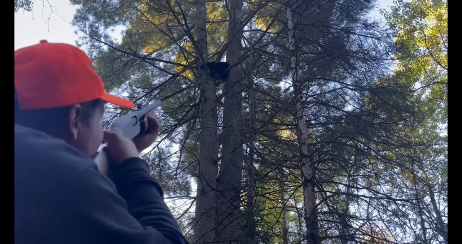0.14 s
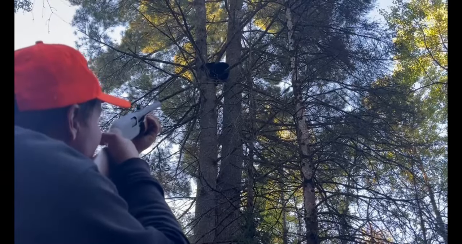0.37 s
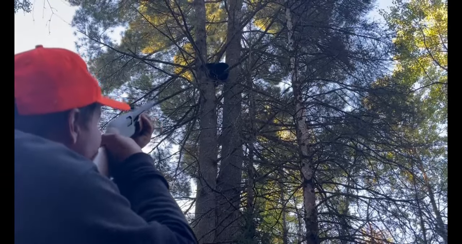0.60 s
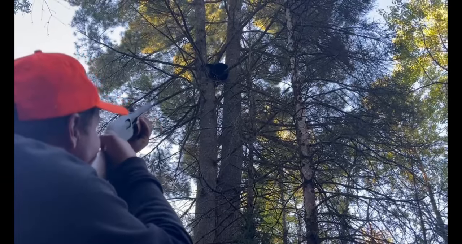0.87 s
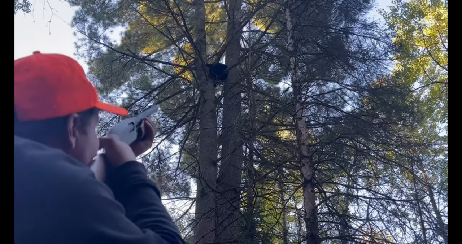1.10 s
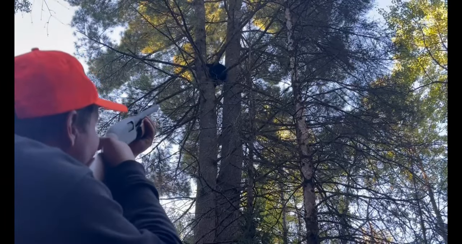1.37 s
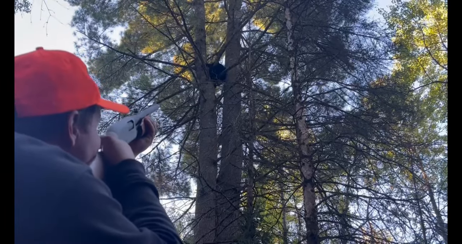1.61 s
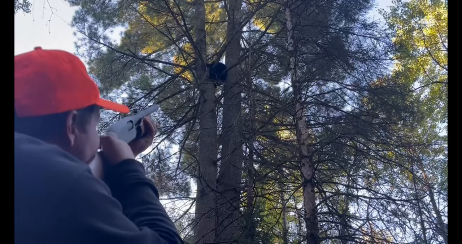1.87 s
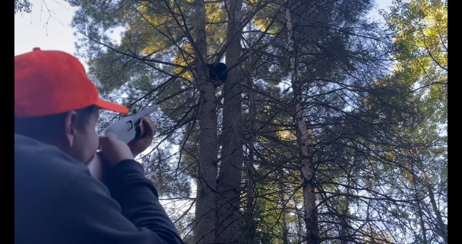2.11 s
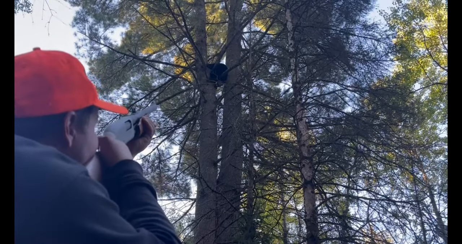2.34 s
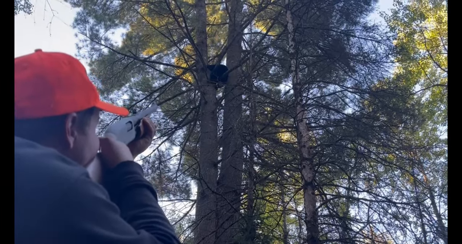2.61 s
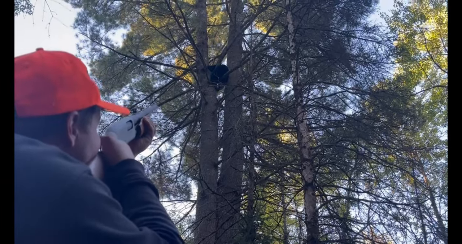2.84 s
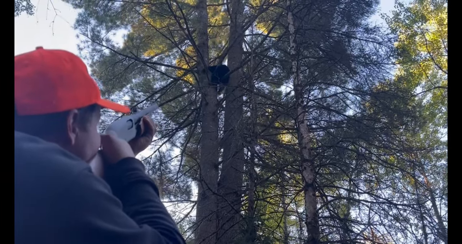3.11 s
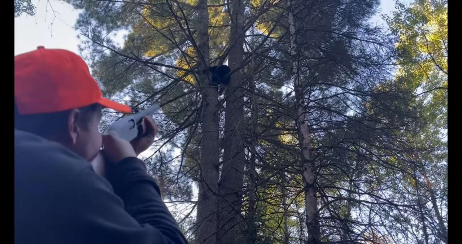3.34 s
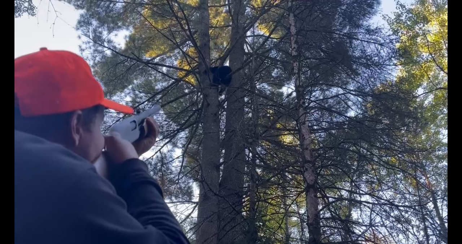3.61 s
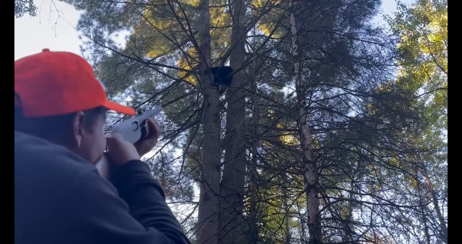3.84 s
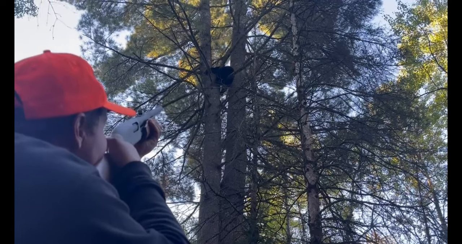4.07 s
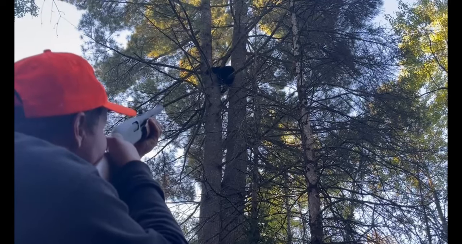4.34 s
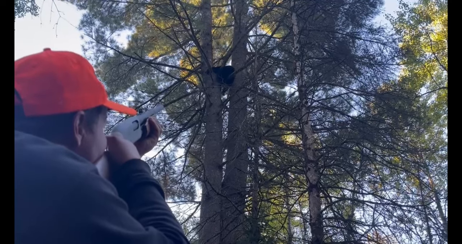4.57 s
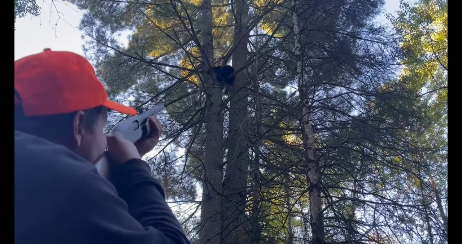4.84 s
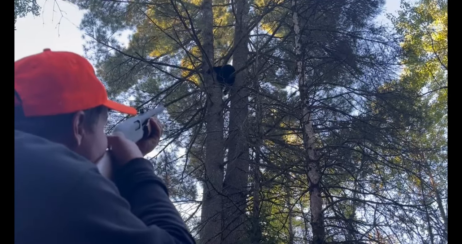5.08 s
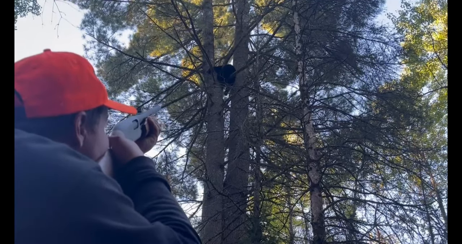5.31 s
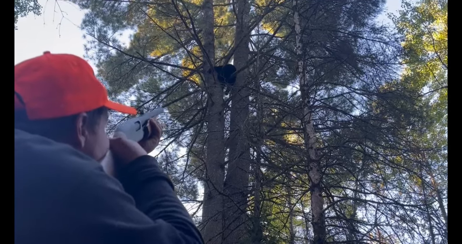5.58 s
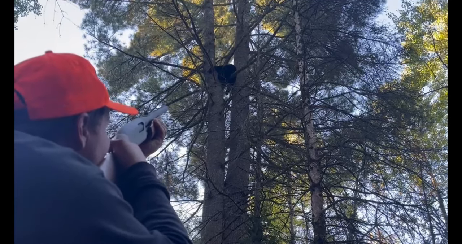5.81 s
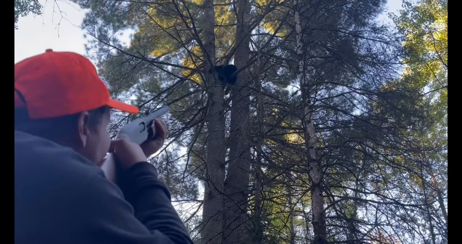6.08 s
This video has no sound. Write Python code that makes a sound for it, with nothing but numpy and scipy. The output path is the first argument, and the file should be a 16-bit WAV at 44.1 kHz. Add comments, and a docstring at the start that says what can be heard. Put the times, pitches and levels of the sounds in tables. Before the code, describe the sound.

Several hunting dogs bark rapidly over one another, one bawling in a deep rattling voice, with short woodland echoes and faint air hiss.

```python
"""Among tree trunks, a pack of hounds bays below a two-port microphone.
Several dogs bark in seven kinds of call, each a stack of partials over pulsed breath; another kind yelps, and
hoarse bawls come from slow fold slaps ringing chest and mouth, steadying at times into a low rattle.
Thin whines sound among the calls, and low tones slide down near their ends. Trunks scatter echoes as decaying
noise; wind rumble, a patchy haze of distant echo and hiss are coloured noise; a twig ticks in noise bursts."""
import sys
import numpy as np
from scipy import signal
from scipy.fft import rfft, irfft, next_fast_len
from scipy.io import wavfile
from scipy.ndimage import uniform_filter1d, map_coordinates

SR = 44100
rng = np.random.default_rng(int(sys.argv[2]) if len(sys.argv) > 2 else 0)


def boost_factor(decibels):
    """Convert a level in decibels to a linear amplitude factor."""
    exponent = np.asarray(decibels, float) / 20
    return 10 ** exponent


def log_audio(samples):
    """Write samples as a 16-bit WAV file to the path given in sys.argv[1]."""
    # one column per channel
    frames = np.atleast_2d(samples).T
    # limit to full scale, then quantise
    limited = np.clip(frames, -1, 1)
    pcm = np.round(limited * 32767).astype(np.int16)
    wavfile.write(sys.argv[1], SR, pcm)


N = 272979


def unit(x):
    """Scale to rms 1."""
    return x / np.sqrt(np.mean(x ** 2) + 1e-20)


def along(points, hz):
    """Read a curve of (Hz, value) points on a log frequency axis."""
    f, v = np.transpose(points)
    return np.interp(np.log(hz + 1), np.log(f + 1), v)


def filtered(x, response):
    """Multiply the spectrum of x by a response of frequency, which may be complex."""
    m = next_fast_len(x.shape[-1] + 8192)
    spectrum = rfft(x, m) * response(np.fft.rfftfreq(m, 1 / SR))
    return irfft(spectrum, m)[..., :x.shape[-1]]


def coloured(x, colour):
    """Filter x to a (Hz, dB) colour without shifting its phase."""
    return filtered(x, lambda hz: boost_factor(along(colour, hz)))


def wobble(size, rate):
    """A smooth random curve, rate knots a second."""
    knots = rng.standard_normal(int(size * rate / SR) + 4)
    return map_coordinates(knots, [np.arange(size) * rate / SR])


def sine(hz):
    """A sine of rms 1 that follows a pitch curve."""
    return np.sqrt(2) * np.sin(2 * np.pi * np.cumsum(hz) / SR)


def played(rows, fade):
    """First sample, soft-edged window (fade in s) and per-sample columns of one call."""
    s, *cols = np.transpose(rows)
    t = np.arange(round(s[0] * SR), min(N, round(s[-1] * SR))) / SR
    # a call touching either end of the scene is already, or still, at full level there
    since_start = t - s[0] + (s[0] < .005)
    until_end = s[-1] - t + (s[-1] > N / SR - .02)
    edge = np.clip(np.minimum(since_start, until_end) / fade, 0, 1)
    return round(s[0] * SR), np.sin(edge * np.pi / 2) ** 2, [np.interp(t, s, c) for c in cols]


def shaped(call, shape):
    """Bend one call to its kind: the shape stretched to its length, pitch and levels."""
    start, length, hz, db, under_db = call
    return [(start + share * length, ratio * hz, db + main, db + under_db + upper)
            for share, ratio, main, upper in shape]


# colour of the breath rushing behind the barks: freq_hz, relative_db per Hz
BREATH_COLOUR = [(250, -52), (500, 3.5), (1000, -11.5), (2000, -7), (2500, -33.5), (3000, -47),
                 (4500, -66.5), (7000, -110)]


def sung_calls(calls, shape, strongest, offsets_db, fall_db):
    """Each call stacks partials on a slightly unsteady pitch, over breath gated once a cycle."""
    muzzle_hz, muzzle_width_hz, muzzle_db = 2250, 400, 24  # above this the muzzle lets little through
    out = np.zeros(N)
    for call in calls:
        start, window, (hz, lead, fourth) = played(shaped(call, shape), fade=.007)
        size = len(hz)
        phase = 2 * np.pi * np.cumsum(hz * (1 + 0.011 * wobble(size, 88.7))) / SR
        # partials between the strongest and the fourth slope from one to the other
        slope = (fourth - lead) / (4 - strongest)
        levels = [lead + slope * max(k - strongest, 0) + db for k, db in enumerate(offsets_db, 1)]
        # from the fourth up they fall off, steeply past the muzzle's limit, then level out faintly
        for k in range(10):
            shut_db = muzzle_db * np.clip(((k + 4) * hz - muzzle_hz) / muzzle_width_hz, 0, 1)
            levels.append(fourth - np.minimum(k * fall_db + shut_db, 27 + 1.5 * k))
        tone = np.zeros(size)
        for k, db in enumerate(levels, 1):
            flicker_db = (1.5 + .8 * min(k, 5)) * wobble(size, 45)
            tone += boost_factor(db + flicker_db) * np.sin(k * phase + k * k)
        puffs = (1 + np.cos(phase)) * rng.standard_normal(size)
        breath = boost_factor(levels[2]) * unit(coloured(puffs, BREATH_COLOUR))  # as strong as the third partial
        out[start:start + size] += window * (np.sqrt(2) * tone + breath)
    return out


# phase of the pack between the ports: freq_hz, left_lead_rad
PORT_LEAD = [(0, 0), (260, 0.6), (690, 1.2), (1030, 1.4), (1290, 2.9), (1550, 2.9), (1810, 0.5),
             (2410, 1.4), (2760, 0.8)]
# level of the pack between the ports: freq_hz, left_over_right_db
PORT_BALANCE = [(60, -4.5), (130, 4.5), (270, -4), (580, -0.5), (1220, -7.5), (2600, -6.5)]


def ports(x, lead_ms):
    """Sound from below meets the ports at other times and levels; their mean mostly keeps its level."""
    def pair(hz):
        lead_rad = along(PORT_LEAD, hz) + 2 * np.pi * hz * lead_ms / 1000
        left = boost_factor(along(PORT_BALANCE, hz)) * np.exp(1j * lead_rad)
        mean = np.maximum(np.abs(1 + left) / 2, .3)  # the floor limits the boost where the ports cancel
        return np.array([left, 1 + 0 * left]) / mean
    return filtered(x, pair)


# eight kinds of call, before each kind's shape bends them; columns of all eight tables:
# start_s, length_s, pitch_hz, strongest_partial_db, fourth_partial_db (relative to the strongest)
# low barks: same columns
LOW_BARKS = [(0.118, 0.21, 427.5, -37, -9), (0.962, 0.18, 414, -37.5, -9), (1.572, 0.17, 428.5, -40, -10),
             (2.099, 0.16, 405.6, -37.5, -25.5), (2.549, 0.14, 432.7, -34, -22.5),
             (3.184, 0.16, 412.5, -34.5, -20), (3.474, .18, 410.2, -33.5, -18.5),
             (3.928, 0.23, 389.9, -39, -14), (4.361, .2, 399.3, -38.5, -17.5),
             (5.034, 0.14, 415.8, -38.5, -16.5), (5.279, .2, 389.3, -40, -4.5)]
# bright barks: same columns
BRIGHT_BARKS = [(0.28, 0.037, 582, -33.5, -37), (0.771, 0.11, 502.7, -28, -12),
                (1.21, 0.11, 500.6, -27, -24.5), (1.88, 0.11, 568, -29.5, -19.5),
                (2.262, 0.14, 536.2, -30.5, -19), (2.649, .11, 568, -30, -19.5),
                (3.03, 0.04, 465.6, -37.5, 5.5), (3.04, 0.057, 515.3, -28.5, -10.5),
                (3.41, 0.1, 544.9, -25.5, -24.5), (4.039, .12, 550.3, -27, -21.5),
                (4.462, .1, 543, -28, -19.5), (5.151, .165, 567.8, -26, -15), (6.032, .07, 478, -34, -11.5)]
# sharp barks: same columns
SHARP_BARKS = [(0, 0.072, 490.5, -28, -4.5), (0.346, .07, 451.6, -21.5, -22),
               (0.395, 0.08, 482.5, -25.5, -4), (.54, .1, 445.2, -27.5, -8.5), (.6, 0.15, 440.2, -28.5, -5),
               (0.613, 0.06, 495, -30.5, -7), (.82, 0.14, 532.7, -26.5, -12), (1.235, 0.033, 516, -34, 4),
               (1.521, 0.093, 473.4, -39.5, -1.5), (1.705, 0.087, 427, -30, -19),
               (1.712, 0.041, 528.7, -24.5, -8), (1.99, 0.12, 456.5, -37.5, -9.5),
               (2.12, 0.055, 430, -48.5, 7), (3.339, 0.083, 450, -44.5, 3.5),
               (3.471, 0.053, 480.6, -31.5, -4.5), (3.689, 0.084, 400.7, -28, -18.5),
               (3.932, 0.06, 472, -30.5, -8.5), (3.981, 0.065, 468, -38.5, -1),
               (4.398, 0.077, 476, -32, -1.5), (4.45, .08, 493, -41, 3), (4.56, .09, 445, -41, 1.5),
               (4.877, 0.098, 493.5, -33, -13.5), (5.201, 0.11, 454.5, -36, 0.5),
               (5.638, 0.091, 541.7, -25.5, -18), (5.724, 0.049, 463.7, -29, -3.5),
               (5.77, 0.041, 440, -42, 5.5), (5.761, 0.077, 495.4, -43, 3.5), (5.91, .05, 541, -36.5, -24),
               (6.069, .11, 533, -30.5, -23.5)]
# mellow barks: same columns
MELLOW_BARKS = [(0, 0.25, 529.8, -21.5, -44), (.63, 0.27, 519.7, -21, -44),
                (0.853, 0.07, 546.6, -16, -31.5), (.91, 0.099, 516.5, -17.5, -22.5),
                (1.24, .21, 530.2, -19.5, -38), (3.23, .13, 491, -21.5, -48.5),
                (4.271, .075, 554, -23, -22.5), (4.34, 0.073, 493, -32.5, -31),
                (4.425, .15, 508.8, -19.5, -27), (5.54, 0.052, 515, -23, -41),
                (5.761, 0.1, 469.9, -17.5, -38.5), (5.9, 0.088, 511.9, -21, -30)]
# plain barks led by the fundamental: same columns
PLAIN_BARKS = [(.335, 0.22, 457, -14.5, -21.5), (.5, 0.15, 427.4, -32, -13),
               (1.199, .27, 428.5, -28.5, -13.5), (1.47, 0.065, 496, -36.5, -42.5),
               (1.57, 0.11, 511.3, -28, -37), (2.31, .07, 515.5, -35, -32.5), (2.37, 0.17, 543, -31, -32),
               (3.361, 0.13, 514, -19, -45.5), (3.65, 0.064, 509, -20, -23),
               (4.132, 0.076, 467.4, -25.5, -37), (5.41, 0.13, 472, -31, -27)]
# barks whose pitch arches up and back down: same columns
ARCHING_BARKS = [(1.94, 0.13, 659, -31.5, -36.5), (2.109, 0.21, 494, -38, -2.5),
                 (2.53, 0.24, 515, -24, -14)]
# falling yelps: same columns
FALLING_YELPS = [(0, 0.054, 550.3, -30.5, -5.5), (.3, 0.077, 388.7, -35.5, -10.5),
                 (1.171, 0.045, 453, -33.5, -16.5), (1.28, .07, 464.6, -32.5, 1.5),
                 (2.735, 0.074, 448, -30, -9.5), (3.21, 0.073, 536, -30.5, -22),
                 (4.17, 0.084, 484.7, -37.5, -17), (4.253, 0.055, 437.6, -39, -0.5),
                 (5.57, 0.095, 409, -32, -19.5), (5.921, 0.04, 446, -44.5, 1),
                 (5.96, 0.055, 537, -35.5, -17.5)]
# barks that hold their pitch and plunge at the end: same columns
PLUNGING_BARKS = [(.04, .125, 480, -22, -32), (1.72, .18, 560, -20, -24), (3.49, .19, 488, -22, -34),
                  (5.235, .19, 505, -21, -38)]
# how each kind bends its calls: length_share, pitch_ratio, strongest_offset_db, fourth_offset_db
CALL_SHAPES = [
    [(0, 0.72, -2.5, 2), (.25, 0.97, 0, -1), (.7, 1.02, 2, -7.5), (.85, .99, -1, -13.5),
     (1, 0.92, 5.5, -11.5)],
    [(0, .83, -10, -10), (.3, .92, -5, -1), (.55, .99, -1, 0), (.8, 1.045, 0, -3), (1, 1.06, -20, -18)],
    [(0, 0.93, -6, -5.5), (.25, 1.003, -4, -3.5), (.6, 1.01, -2, -5), (1, 0.96, -14, -21)],
    [(0, 1.14, -9, -11), (.2, 1.01, -1.5, -8.5), (.8, .995, -3, -13.5), (1, 0.88, -10, -5.5)],
    [(0, 1.01, -19.5, -8.5), (.25, 1.01, -1.5, -8), (.65, .99, -8, -9.5), (1, 0.89, -10.5, -2.5)],
    [(0, .78, -21, -14), (.2, .9, -12, -3), (.3, .97, -4, 0), (.4, 1.01, 2, 0), (.55, .95, 0, -7),
     (.8, .88, -3, -11), (1, .76, -8, -18)],
    [(0, 1.03, -9.5, -6), (.25, 1.03, 1.5, -1.5), (.7, .97, -0.5, -7), (1, 0.96, -2, -5.5)],
    [(0, .97, -10, -4), (.2, 1.0, -1, -2), (.45, 1.01, 0, -4), (.64, .97, -2, -6), (.8, .8, -11, -12),
     (1, .68, -16, -18)],
]
# which partial leads each kind: partial_number
LEADING_PARTIALS = [2, 2, 2, 1, 1, 1, 2, 1]
# timbre and place of each kind: partial_1_offset_db, partial_2_offset_db, partial_3_offset_db,
# fall_db (per partial above the fourth), extra_left_lead_ms
CALL_TIMBRES = [(-10, 0, -4, 12, 0.01), (-10, 0, -1, 9, -0.03), (-9, 0, -4, 9, -0.02), (0, -3, -3, 6, 0.03),
                (0, -3, -2, 6, 0.02), (0, 0, 0, 11, 0.03), (-9, 0, -5, 6, 0.0033), (0, -3, 4, 6, 0.03)]


def barks_and_yelps():
    """All eight kinds of call, each meeting the two ports with its own small delay."""
    kinds = (LOW_BARKS, BRIGHT_BARKS, SHARP_BARKS, MELLOW_BARKS,
             PLAIN_BARKS, ARCHING_BARKS, FALLING_YELPS, PLUNGING_BARKS)
    out = np.zeros((2, N))
    for calls, shape, strongest, timbre in zip(kinds, CALL_SHAPES, LEADING_PARTIALS, CALL_TIMBRES):
        *offsets_db, fall_db, lead_ms = timbre
        out += ports(sung_calls(calls, shape, strongest, offsets_db, fall_db), lead_ms)
    return out


def din_db(pack):
    """Smoothed level of the pack's upper partials around its mean."""
    upper = coloured(pack, [(900, -35), (1500, -2.0), (4000, -2.5)])
    power = uniform_filter1d(upper ** 2, size=round(.05 * SR))  # 50 ms
    level = 10 * np.log10(np.abs(power) + 1e-6)
    return level - level.mean()


def patchy(x, depth_db):
    """Random patches of gain over time and frequency, back at rms 1."""
    z = signal.stft(x, nperseg=512)[2]
    field = uniform_filter1d(rng.standard_normal(z.shape[1:]), size=5, axis=0)
    field = uniform_filter1d(field, size=8, axis=1)
    return unit(signal.istft(z * boost_factor(depth_db * unit(field)), nperseg=512)[1][:, :N])


# colour of the wind on the ports: freq_hz, relative_db per Hz
RUMBLE_COLOUR = [(15, -64.5), (30, -33.5), (60, 1.5), (150, -0.5), (300, -10), (2800, -39.5)]
# colour of the haze of distant echo: freq_hz, relative_db per Hz
HAZE_COLOUR = [(250, -18.5), (500, -1.5), (1000, -14.5), (2000, -24), (2600, -20), (3000, -53)]
# colour of the hiss: freq_hz, relative_db per Hz
HISS_COLOUR = [(2300, -42), (3000, -5.5), (5000, -5.5), (6500, -9), (7500, -13.5), (8000, -45), (8900, -43),
               (9300, -13.5), (12500, -25.5), (15000, -49)]
# phase of the hiss between the ports: freq_hz, left_lead_rad
HISS_PORT_LEAD = [(3000, .8), (6000, .9), (9000, 2.1), (11500, 2.1), (13000, .9)]


def air(pack):
    """Lumpy wind rumble and patchy hiss swell with the din, over a faint patchy haze of the pack's distant echo."""
    noise = rng.standard_normal((3, 3, N))
    own_share = np.array([.07, .4, .18])[:, None, None]  # noise private to each port, over a shared one
    near_mono = noise[:, :1] + own_share * noise[:, 1:]
    colours = (RUMBLE_COLOUR, HAZE_COLOUR, HISS_COLOUR)
    rumble, haze, hiss = [unit(coloured(v, colour)) for v, colour in zip(near_mono, colours)]
    din = din_db(pack)
    rumble = rumble * boost_factor(-69 + 0.28 * din + 5 * wobble(N, 7))
    haze = boost_factor(-53) * patchy(haze, depth_db=4)
    # half the phase lead goes to each port, with opposite signs
    hiss = filtered(hiss, lambda hz: np.exp(.5j * np.outer([1, -1], along(HISS_PORT_LEAD, hz))))
    hiss = patchy(hiss, depth_db=4) * boost_factor(-64 + .55 * din + 0.28 * wobble(N, 8.7))
    return rumble + haze + hiss


# how fast the echo dies among the trees: freq_hz, t60_s
TRUNK_DECAY = [(300, 0.4), (1000, 0.56), (4000, 0.15)]


def trunks(x):
    """Scattered echoes from the trees, each frequency dying at its own speed."""
    hz, t, z = signal.stft(rng.standard_normal((2, SR // 2)), SR, nperseg=256)
    decay = boost_factor(-60 * t / along(TRUNK_DECAY, hz)[:, None])
    tail = signal.istft(z * decay, SR, nperseg=256)[1]
    tail = .5 * tail[0] + .8 * tail  # partly shared by the ports
    late = np.pad(x, (500, 0))[None]  # the first echo comes 500 samples late
    return signal.fftconvolve(late, tail / np.linalg.norm(tail[0]), axes=1)[:, :N]


# the folds run down as a call dies: start_s, level_db
FOLD_RUN_DOWNS = [(0.148, -63.5), (0.319, -69), (0.678, -56.5), (0.749, -64), (1.04, -68), (1.17, -72),
                  (1.471, -61), (1.9, -64.5), (2.27, -57), (3.25, -58.5), (3.351, -67), (3.65, -59),
                  (4.18, -59), (4.56, -58), (5.138, -64), (5.39, -63)]


def run_downs():
    """Faint low tones that slide far down in pitch as the folds slow."""
    length_s, from_hz, to_hz = .09, 330, 90
    out = np.zeros(N)
    for s, db in FOLD_RUN_DOWNS:
        slide = [(s, np.log(from_hz)), (s + length_s, np.log(to_hz))]
        start, window, (log_hz,) = played(slide, fade=.03)
        out[start:start + len(window)] += window * boost_factor(db) * sine(np.exp(log_hz))
    return out


# thin whistled whines through a nose: start_s, length_s, first_hz, last_hz, level_db
NOSE_WHINES = [(.15, .14, 5100, 4550, -66), (.16, .12, 5350, 4850, -70), (.16, .12, 4800, 4250, -70),
               (3.52, .1, 7250, 7050, -72), (3.6, .07, 7050, 5800, -73), (3.52, .1, 3680, 3500, -70),
               (3.6, .1, 3500, 2900, -69), (3.8, .16, 5420, 5280, -70), (4.38, .12, 6250, 6200, -72),
               (4.68, .17, 5480, 5280, -71), (5.12, .11, 2250, 3400, -66), (5.42, .12, 3900, 3650, -74),
               (3.72, .14, 3150, 3300, -68), (4.6, .2, 3050, 3400, -67), (4.88, .07, 2800, 3500, -68),
               (2.03, .05, 2950, 3150, -71), (2.07, .05, 3150, 2950, -71)]


def whines():
    """Faint wavering whistles that swell and fade along one glide."""
    out = np.zeros(N)
    for s, length, first, last, db in NOSE_WHINES:
        start, window, (hz,) = played([(s, first), (s + length, last)], fade=0.036)
        size = len(hz)
        waver = 1 + .008 * wobble(size, 40)
        out[start:start + size] += window * boost_factor(db + 2 * wobble(size, 50)) * sine(hz * waver)
    return out


def causal(spectrum):
    """Minimum-phase impulse response of a (Hz, dB) colour: it rings only after it is struck."""
    cep = irfft(np.log(boost_factor(along(spectrum, np.fft.rfftfreq(8192, 1 / SR)))))
    cep[1:4096] *= 2
    cep[4097:] = 0
    return irfft(np.exp(rfft(cep)))[:4096]


# bawls, one list of rows each: time_s, slap_rate_hz, chest_db, mouth_db, irregularity (0-1)
BAWL_CALLS = [
    [(.36, 91, -20.5, -25, .8), (.45, 88, -19.5, -25, .8), (.52, 86, -20.5, -25, .7),
     (.64, 86, -22, -26, .7), (.69, 76, -34, -28, .9), (.75, 76, -42, -29, .9)],
    [(1.2, 89, -20, -26, .8), (1.3, 86, -19, -26, .8), (1.4, 85, -21, -27, .7), (1.47, 76, -26, -29, .8)],
    [(2.742, 89, -21, -26, .7), (2.84, 85, -21, -30, .4), (2.9, 86, -21.5, -30, .1),
     (3.03, 86.5, -21.5, -31.5, .1), (3.1, 87, -20.5, -29, .7), (3.22, 87, -22, -30, .7),
     (3.33, 74, -30, -33, .8)],
    [(3.68, 76, -25, -35, .8), (3.77, 83, -21, -32, .7), (3.86, 82.5, -21, -34, .25),
     (4.06, 82, -20.5, -34, .25), (4.1, 80, -22, -32, .6), (4.18, 71, -28, -35, .7)],
    [(4.549, 79, -27, -36, .8), (4.62, 81, -21, -28, .7), (4.72, 82, -21, -31, .7),
     (4.8, 82.5, -21, -31, .6), (4.86, 87, -22, -31, .06), (5.0, 87, -22, -32, .06),
     (5.08, 85.5, -22, -30, .5), (5.15, 69, -30, -32, .6)],
    [(5.555, 76, -27, -33, .8), (5.61, 80, -21, -27, .8), (5.68, 82, -19, -29, .8),
     (5.88, 85, -18.5, -29, .6), (5.96, 85.5, -20.5, -29, .04), (6.3, 85.5, -20.5, -29, .04)],
]
# resonance of the bawling chest: freq_hz, relative_db
CHEST_RESONANCE = [(200, -52), (258, -36), (330, -30), (425, 0), (510, 0), (600, -21), (700, -48),
                   (1200, -120)]
# resonance of the mouth: freq_hz, relative_db
MOUTH_RESONANCE = [(450, -59), (600, -10), (690, 4), (780, -3), (950, -13), (1190, -14), (1295, -3),
                   (1400, -14), (1500, -18), (1720, -15), (2100, -44), (2600, -48), (3050, -46),
                   (3300, -39), (3550, -48), (4200, -70), (6000, -120)]
# the same mouth wide open, while the slaps are uneven: freq_hz, relative_db
GAPE_RESONANCE = [(450, -56), (600, 3.5), (800, 2), (1050, -7.5), (1450, -10), (1850, -13.5), (2150, -34.5),
                  (2600, -47.5), (3300, -38.5), (4200, -65), (6000, -120)]
# the folds' own tones: cycles_per_slap, level_db (relative to the chest), pitch_waver_share
SUNG_TONES = [(5, -4.5, .012), (6, -3, .025)]


def bawler():
    """Slow fold slaps ring chest and mouth: steady ones a comb of lines, uneven a roar round two sung tones."""
    out = np.zeros(N + 4096)
    for bawl in BAWL_CALLS:
        start, window, (rate, chest_db, mouth_db, uneven) = played(bawl, fade=0.027)
        uneven = np.clip(uneven, 0, 1)
        size = len(rate)
        jitter = np.exp(.25 * uneven * wobble(size, 60) + .006 * wobble(size, 20))
        turns = np.cumsum(rate * jitter) / SR
        slaps = np.diff(np.floor(turns), prepend=0) * boost_factor(4 * uneven * rng.standard_normal(size))
        drive = (1 - .6 * uneven) * unit(slaps) + (.03 + .45 * uneven) * rng.standard_normal(size)
        for cycles, db, waver in SUNG_TONES:
            sung = sine(cycles * rate * (1 + waver * wobble(size, 25)))
            sung_gain = uneven * boost_factor(chest_db + db + 3 * wobble(size, 30))
            out[start:start + size] += window * sung_gain * sung
        rasp = .26 * rng.standard_normal(size)  # breath that always rings the mouth
        # each slap flutters over 512 samples before the mouth: even in colour, spread in time
        flutter = irfft(np.exp(2j * np.pi * rng.random(512 // 2 + 1)))
        mouth_drive = signal.fftconvolve(drive, flutter)[:size] + rasp
        mouth_db = mouth_db + 3 * wobble(size, 22)
        gape = np.clip(uneven / .8, 0, 1) * np.pi / 2  # crossfade angle towards the wide-open mouth
        tracts = ((chest_db - 5 * uneven, CHEST_RESONANCE, drive),
                  (mouth_db, MOUTH_RESONANCE, np.cos(gape) * mouth_drive),
                  (mouth_db, GAPE_RESONANCE, np.sin(gape) * mouth_drive))
        for db, resonance, source in tracts:
            ring = causal(resonance)
            sound = signal.fftconvolve(window * boost_factor(db) * source, ring / np.linalg.norm(ring))
            out[start:start + len(sound)] += sound
    return out[:N]


# ticks of the twig: start_s, level_db (before an 8 dB lift and the colour)
TWIG_TICKS = [(1.0093, -52.5), (1.4454, -59.5), (1.937, -64.5), (2.139, -50), (2.207, -53), (2.4277, -62),
              (5.0847, -65)]


def twig():
    """Dry, very short noise bursts, strongest in the treble."""
    out, t = np.zeros(N), np.arange(300) / SR
    for s, db in TWIG_TICKS:
        burst_db = db + 8.0 - 60 * t / 0.0035  # falls 60 dB in 3.5 ms
        out[round(s * SR):][:len(t)] += boost_factor(burst_db) * rng.standard_normal(len(t))
    return coloured(out, [(1500, -37.0), (4000, 1.0), (11000, 1.5), (15000, -9.0)])


def scene():
    """The pack with its echoes, whines and run-downs, over air and twig."""
    pack = barks_and_yelps() + ports(bawler(), lead_ms=0.0033)
    echo = boost_factor(-11.5) * trunks(pack.mean(axis=0))
    din = (pack + echo).mean(axis=0)
    return pack + echo + whines() + run_downs() + air(din) + twig()


def band_limit(x):
    """A steep low-pass at the top of the band."""
    return signal.sosfilt(signal.butter(12, 14500, fs=SR, output="sos"), x)


def record(dry):
    """Fade out the last 5 ms and deliver the mix."""
    fade = np.clip(np.arange(N)[::-1] / (.005 * SR), 0, 1)
    return band_limit(dry * fade)


dry = scene()
out = record(dry)
log_audio(out)
```